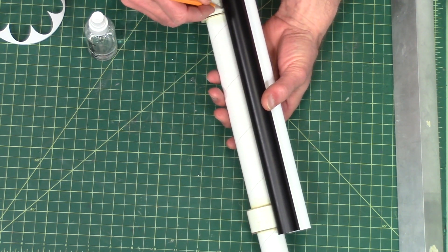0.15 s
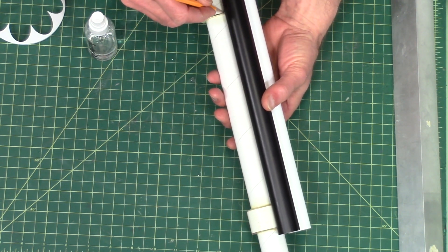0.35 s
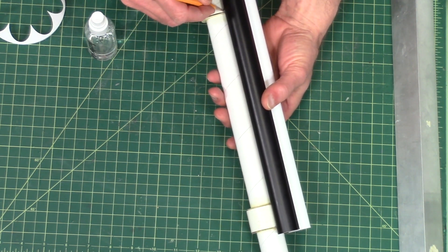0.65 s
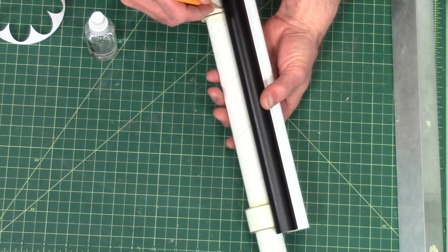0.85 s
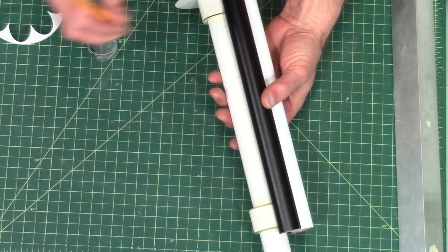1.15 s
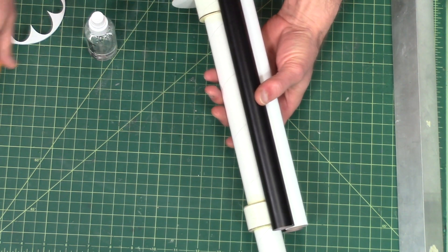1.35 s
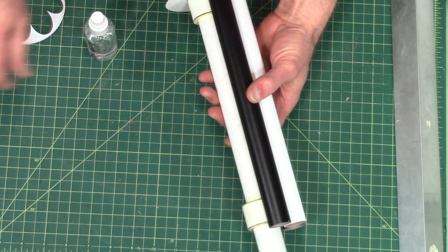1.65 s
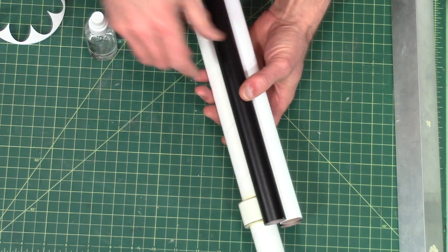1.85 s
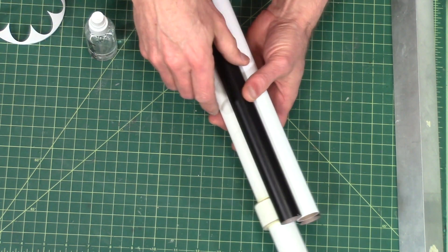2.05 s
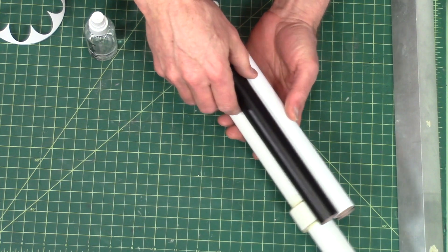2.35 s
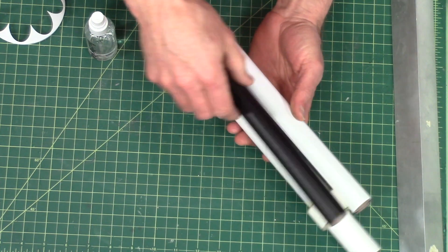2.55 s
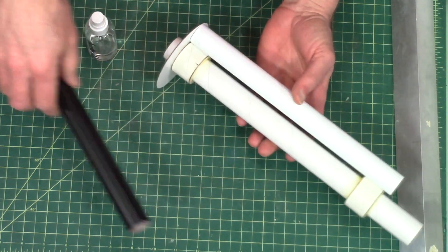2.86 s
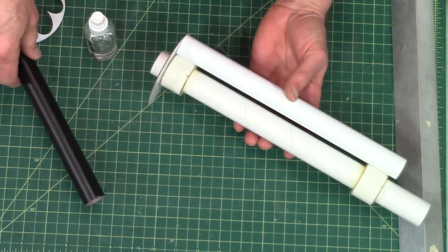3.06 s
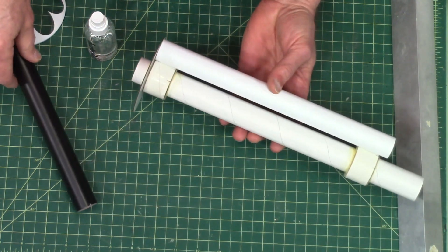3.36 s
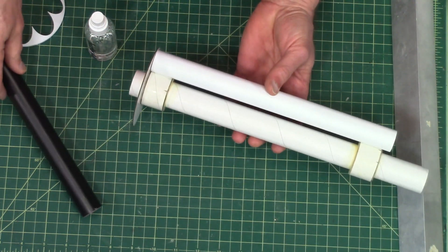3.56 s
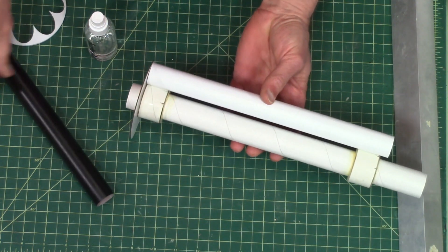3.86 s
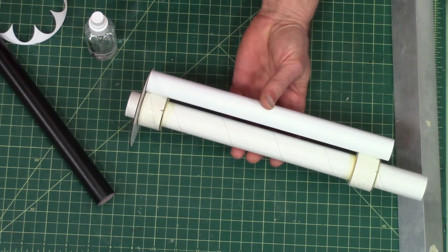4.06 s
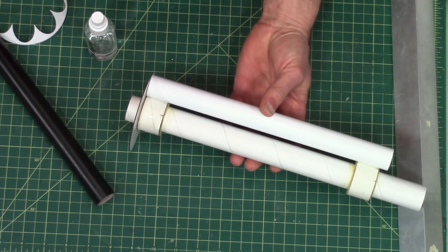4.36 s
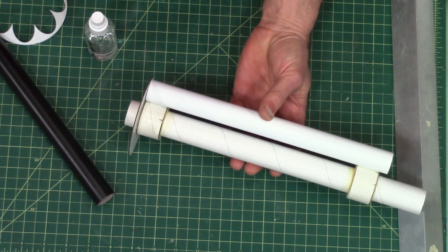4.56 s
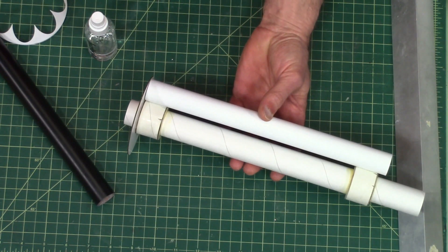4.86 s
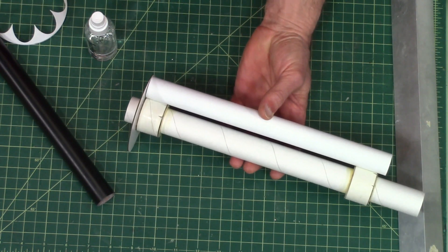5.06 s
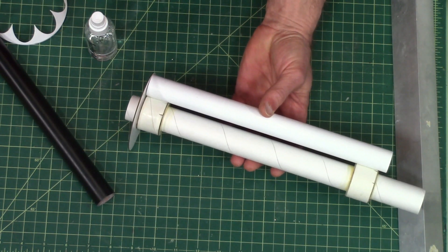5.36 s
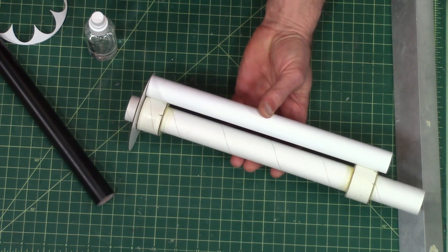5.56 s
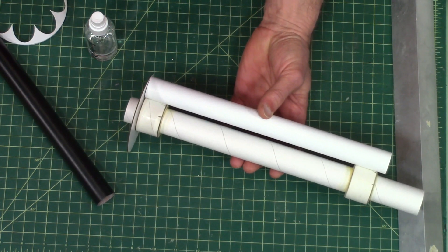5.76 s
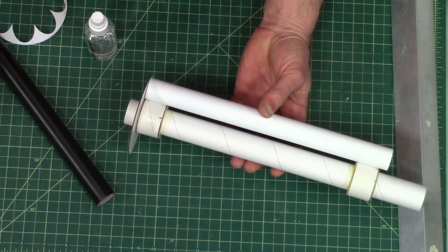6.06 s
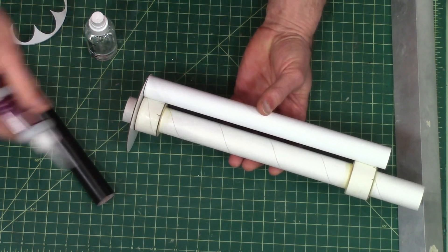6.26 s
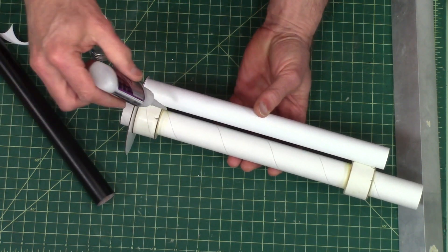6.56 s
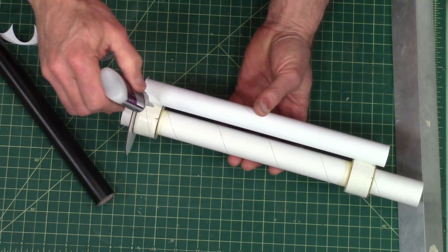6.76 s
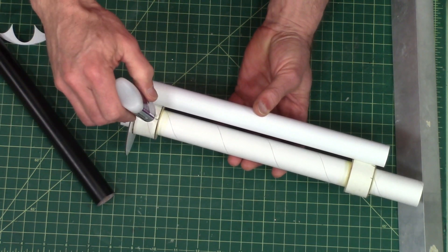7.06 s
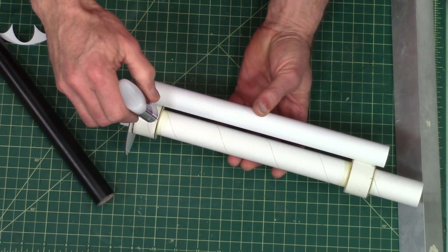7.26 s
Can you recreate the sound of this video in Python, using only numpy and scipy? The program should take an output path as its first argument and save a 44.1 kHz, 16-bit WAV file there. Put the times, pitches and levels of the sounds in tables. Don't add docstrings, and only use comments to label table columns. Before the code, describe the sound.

Dry workbench sounds with a short room tail: very soft pencil scrapes, a snappy pencil bounce, dull hollow cardboard knocks, a tube settling on a rubbery mat and a brief rattle. Later a plastic bottle strikes the bench, lower and more ringing, bouncing briefly. Small rubs, faint squeaks and light taps fill the gaps, over steady hiss and a low wandering engine drone.

```python
import sys
import numpy as np
from scipy import signal
from scipy.fft import rfft, irfft
from scipy.io import wavfile
from scipy.ndimage import uniform_filter1d

SR = 44100
rng = np.random.default_rng(int(sys.argv[2]) if len(sys.argv) > 2 else 0)


def transcribe(u):
    v = np.clip(np.atleast_2d(u).T, -1, 1)
    q = np.round(v * 32767).astype(np.int16)
    wavfile.write(sys.argv[1], SR, q)


def natural_amplitude(level_db):
    exponent = np.asarray(level_db, float) / 20
    return 10 ** exponent


N = 326340


def unit(x):
    return x / np.sqrt(np.mean(x ** 2))


def on_log(hz, table):
    table_hz, value = np.transpose(table)
    return np.interp(np.log(hz + 1), np.log(table_hz), value)


def band(x, hz, width_hz):
    return signal.lfilter(*signal.iirpeak(hz, hz / width_hz, SR), x)


def pair(size, likeness):
    hz = np.fft.rfftfreq(size, 1 / SR)
    shared = np.clip(on_log(hz, likeness), 0, 1)
    mid, side = rfft(rng.standard_normal((2, size)))
    sign = np.array([[1], [-1]])
    return hz, (np.sqrt(1 + shared) * mid + np.sqrt(1 - shared) * side * sign) / np.sqrt(2)


def walk(rate):
    k = int(SR / rate)
    steps = np.repeat(rng.standard_normal(N // k + 1), k)
    return unit(uniform_filter1d(uniform_filter1d(steps, k), k)[:N])


def swells(s, hold, db, rise_db_s, fall_db_s):
    power, t = np.zeros(N), np.arange(N) / SR
    for start, held, level_db in np.broadcast(s, hold, db):
        i, j = np.searchsorted(t, (start - 60 / rise_db_s, start + held + 60 / fall_db_s))
        early = np.maximum(start - t[i:j], 0)
        late = np.maximum(t[i:j] - start - held, 0)
        power[i:j] += natural_amplitude(level_db - rise_db_s * early - fall_db_s * late) ** 2
    return np.sqrt(power)


def hiss():
    # (frequency [Hz], density [dB per Hz])
    colour = [(20, -12), (50, -25), (100, 2.5), (155, -3), (200, -12), (700, -19), (950, -29), (1600, -24),
              (2200, -28.5), (3500, -30.5), (6300, -24.5), (9000, -28.5), (12500, -34), (15800, -36.5)]
    # (frequency [Hz], likeness [0-1])
    likeness = [(60, 0.77), (130, 0.9), (290, 0.32), (640, 0.21), (1410, 0.07), (3100, 0), (6820, 0.22),
                (15000, 0)]
    # (frequency [Hz], width [Hz], extra gain [ratio])
    right_port = (1978, 160, 2.68)
    hz, noise = pair(N, likeness)
    noise = noise * natural_amplitude(on_log(hz, colour)) * (hz < 15830)
    air = unit(irfft(noise, N)) * natural_amplitude(-56.5 + 0.5 * walk(1.66))
    port_hz, width_hz, extra = right_port
    air[1] += extra * band(air[1], port_hz, width_hz)
    return air


def traffic():
    # (time [s], lower mode level [dB], upper mode level [dB])
    passes = [(.15, -52.5, -72), (.4, -54.5, -63), (.95, -58, -69), (1.59, -54.5, -66), (1.87, -52.5, -54),
              (2.3, -53.5, -56.5), (2.68, -56, -56), (3.24, -51.5, -62), (3.72, -52, -59), (4.1, -65, -58),
              (5.12, -64, -57), (5.43, -62, -52), (7.4, -63, -72)]
    s, lower_db, upper_db = np.transpose(passes)
    fade_db_s = 67
    lower_gain = np.hypot(natural_amplitude(-60), swells(s, 0, lower_db, fade_db_s, fade_db_s))
    upper_gain = np.hypot(natural_amplitude(-63), swells(s, 0, upper_db, fade_db_s, fade_db_s))
    lower = unit(band(band(rng.standard_normal(N), 35.9, 7.6), 36.3, 10.7))
    upper = unit(band(band(rng.standard_normal(N), 70.6, 15.0), 70.6, 15.0))
    return lower_gain * lower * np.array([[1], [0.8]]) + upper_gain * upper


def engine():
    # (time [s], frequency [Hz], level [dB])
    drone = [(0.0, 108.6, -66.5), (0.8, 110.5, -63), (0.95, 89.5, -79), (1.01, 88.4, -60),
             (1.09, 105.3, -65), (1.55, 112.6, -56), (1.98, 102.6, -62), (2.23, 91.7, -61.5),
             (2.45, 110.8, -59.5), (2.9, 107.8, -49), (4.64, 97.2, -54.5), (4.93, 110.8, -72),
             (5.05, 97.7, -52.5), (6.04, 96.9, -59.5), (6.16, 113.6, -57.5), (7.4, 92.6, -68)]
    s, drone_hz, drone_db = np.transpose(drone)
    t = np.arange(N) / SR
    phase = 2 * np.pi * np.cumsum(np.interp(t, s, drone_hz)) / SR
    gain = natural_amplitude(np.interp(t, s, drone_db) + 1.85 * walk(11.0))
    return gain * np.sqrt(2) * np.sin(phase)


def floor():
    left, right = hiss() + traffic() + engine()
    return np.array([left, np.roll(right, 3)])


def slips(rate=5500.0, grain_db=1.5):
    size = natural_amplitude(grain_db * rng.exponential(size=(2, N)))
    happens = rng.random((2, N)) < rate / SR
    return unit(happens * rng.choice([-1., 1.], (2, N)) * size)


def window(s, length, edge):
    t = np.arange(N) / SR - s
    return np.clip(np.minimum(t / edge, 1 + (length - t) / (2 * edge)), 0, 1) ** 2


def pencil():
    # (time [s], length [s], lead resonance [Hz], scrape level [dB], sheen level [dB])
    strokes = [
        (0.094, 0.075, 4300, -58.5, -62.5),
        (0.245, 0.094, 4230, -60.5, -65),
        (0.419, 0.033, 4050, -54.5, -60.5),
        (0.537, 0.049, 4130, -62.5, -66.5),
        (0.664, 0.05, 4200, -61.5, -64),
        (0.778, 0.049, 4100, -62.5, -70),
        (0.844, 0.067, 6700, -59, -64.5),
        (0.924, 0.029, 3750, -57, -58),
    ]
    out = np.zeros((2, N))
    size = int(1.2 * SR)
    slip = slips()[:, :size]
    card = unit(band(band(slip, 6100, 740.0), 6100, 1300.0))
    sheen = unit(band(band(slip, 9000, 2300.0), 9000, 3500.0))
    for s, length, lead_hz, scrape_db, sheen_db in strokes:
        lead = unit(band(band(slip, lead_hz, 910.0), lead_hz, 2000.0))
        stroke = natural_amplitude(scrape_db - 5.5) * (lead + natural_amplitude(-2) * card) + natural_amplitude(sheen_db) * sheen
        out[:, :size] += stroke * window(s, length, 0.018)[:size]
    return out


def squeaks():
    # (time [s], length [s], frequency [Hz], level [dB])
    squeak_rows = [(.95, .012, 3700, -60), (1.38, .06, 380, -65), (1.507, .017, 160, -47),
                   (1.6053, .0022, 6130, -24), (1.6055, .0018, 10400, -44), (2.283, .014, 2100, -63),
                   (2.412, .04, 470, -62), (2.415, .045, 780, -60), (2.42, .03, 950, -64),
                   (3.201, .021, 5600, -49), (3.228, .016, 4080, -35), (3.236, .011, 5850, -38),
                   (3.438, .035, 2230, -57), (3.44, .0041, 5750, -47), (3.442, .0036, 7200, -45),
                   (3.598, .06, 3900, -62), (3.599, .062, 241, -63), (3.602, .005, 2160, -55),
                   (3.609, .047, 380, -63), (3.772, .045, 2200, -70), (3.778, .05, 3950, -70),
                   (3.833, .012, 6000, -45), (3.836, .008, 3950, -38), (3.858, .06, 2220, -57),
                   (3.86, .05, 3980, -57), (3.872, .057, 4750, -56), (3.925, .045, 2220, -62),
                   (4.068, .0033, 1966, -50), (4.5, .07, 700, -71), (4.87, .018, 1550, -61),
                   (4.926, .026, 400, -61), (5.2115, .00055, 8000, -19), (5.219, .0006, 6400, -34),
                   (5.771, .064, 1600, -65.5), (5.93, .024, 1780, -65)]
    out, size = np.zeros((2, N)), SR // 4
    for s, length, hz, db in squeak_rows:
        i = int(s * SR)
        shape = window(0, length, 0.0009)[:size]
        tone = band(band(rng.standard_normal(size), hz, hz / 12), hz, hz / 8)
        tone = np.roll(tone, -size // 2) * shape
        out[:, i:i + size] += natural_amplitude(db) * tone * np.sqrt(np.sum(shape ** 2) / np.sum(tone ** 2))
    return out


def blows(events, modes, clatter_db, tick_left_db, left_db, rock_db, pure_db=0, tuned_db=0,
          contact=1.2, top_hz=11200):
    # (low edge [Hz], high edge [Hz], decay [s])
    clatter = [(166, 880, 0.0056), (1190, 3190, 0.002), (2690, 6800, 0.0013), (6100, 10050, 0.00022)]
    out, t, size = np.zeros((2, N + SR)), np.arange(SR // 3) / SR, 2048
    hz, db, t60 = np.transpose(modes)
    group = np.searchsorted([1000, 2800], hz)
    filters = [signal.butter(2, (lo_hz, hi_hz), "band", fs=SR, output="sos") for lo_hz, hi_hz, _ in clatter]
    decays = np.exp(-np.log(1000) * t / t60[:, None])
    for number, (s, crack_db, thud_db, ring_db, tick_db) in enumerate(events):
        pan_db = np.clip(left_db + rock_db * (-1.) ** number, -6, 6)
        part_db = np.array([thud_db, ring_db, crack_db, tick_db - clatter_db])
        burst_db = part_db + clatter_db - np.array([tuned_db, pure_db, 0, 0])
        loudness, detune, phase, spread = rng.standard_normal((4, len(hz), 1))
        gain = natural_amplitude(db + 1.5 * loudness[:, 0] + part_db[group] - 10.5)
        f = hz[:, None] * (1 + 0.0058 * detune)
        mid, side = rng.standard_normal((2, size))
        i = int((s + 0.0004) * SR)
        for ear, sign in enumerate((1, -1)):
            turn = 2 * np.pi * f * t + 0.5 * phase + sign * spread * np.minimum(f / 2500, 0.8)
            ring = gain @ (np.sin(turn) * decays) * np.minimum(t / 0.00039, 1)
            for k, (lo_hz, hi_hz, decay) in enumerate(clatter):
                width_hz = hi_hz - lo_hz
                burst = 1.096 * (mid + sign * min(lo_hz / 1500, 0.9) * side)
                burst = burst * np.exp(-t[:size] / decay) * np.sqrt(SR / 4 / width_hz)
                burst[ear * k] += contact * SR / 2 / width_hz
                lean_db = sign * tick_left_db / 2 if k == 3 else 0
                ring[:size] += signal.sosfilt(filters[k], burst) * natural_amplitude(burst_db[k] + lean_db)
            out[ear, i:i + len(t)] += ring * natural_amplitude(sign * pan_db / 2)
    return signal.sosfilt(signal.butter(6, top_hz, fs=SR, output="sos"), out[:, :N])


def pencil_drop():
    # (time [s], crack level [dB], thud level [dB], ring level [dB], tick level [dB])
    drops = [
        (1.5114, -50, -49.5, -66, -62),
        (1.5204, -31.5, -48, -38, -38),
        (1.5268, -43, -44.5, -56, -40),
        (1.6014, -19, -38.5, -29.5, -17.5),
        (1.6042, -22.5, -43, -40, -34),
        (1.6075, -46, -49, -48, -20.5),
    ]
    # (frequency [Hz], level [dB], t60 [s])
    modes = [(161.5, 7.5, 0.047), (219, 5, .05), (390, 3, 0.03), (497, 0, 0.057), (573, -6, 0.026),
             (640, -6, 0.018), (1470, -18, 0.012), (1700, 6, 0.021), (2005, 3, 0.02), (2170, 15.5, 0.0056),
             (3130, -7, 0.015)]
    return blows(drops, modes, clatter_db=-4.5, tick_left_db=12.5, left_db=-1.5, rock_db=0.5,
                 contact=0.65, top_hz=13900)


def tube_knock():
    # (time [s], crack level [dB], thud level [dB], ring level [dB], tick level [dB])
    knocks = [
        (2.041, -46, -75, -50, -46),
        (2.1118, -55, -57, -52, -47),
        (2.4055, -37.5, -57, -34.5, -48),
        (2.4122, -29, -56, -38, -29),
        (2.4159, -41, -69, -40.5, -56),
        (2.573, -36, -53.5, -40.5, -44),
        (2.6675, -23.5, -37, -30, -27),
        (2.6715, -23, -32, -22.5, -33),
        (2.6762, -46, -27, -21.5, -43),
        (2.681, -40, -42, -41, -47),
    ]
    # (frequency [Hz], level [dB], t60 [s])
    modes = [(225, -14.5, 0.16), (273, -10, 0.033), (308, 2.5, 0.052), (393, 3.5, 0.055), (460, 0, 0.038),
             (484, 2.5, 0.044), (616, 4, 0.025), (730, -2, .03), (995, -10, 0.018), (1336, -1.5, 0.028),
             (1622, -5.5, 0.026), (1890, 2.5, 0.023), (2030, -8, 0.025), (4450, 4, 0.0026)]
    return blows(knocks, modes, clatter_db=-5.0, tick_left_db=7.0, left_db=-2.0, rock_db=0.5,
                 tuned_db=8, pure_db=1, contact=0.31)


def handling(column):
    # (time [s], hold [s], scrape level [dB], sheen below scrape [dB], tube wall below scrape [dB])
    grips = [
        (2.044, 0.11, -58.5, 6.5, 9),
        (2.394, 0.064, -63, 23, 0),
        (2.772, 0.014, -58.5, 10, 6),
        (3.859, 0.049, -44, 22, 7.5),
        (4.252, 0.0097, -71, 13, -5),
        (4.877, 0.038, -63, 5, 1),
        (5.767, 0.04, -56, 4.5, 7.5),
        (6.21, .03, -64.5, 5, 20),
        (6.261, 0.0042, -60.5, 3, 17),
    ]
    # (time [s], hold [s], scrape level [dB], sheen below scrape [dB], tube wall below scrape [dB])
    slides = [(2.2, .066, -67.5, 8, 3.3), (2.36, .022, -63, 3, 9), (2.47, .025, -78, 18, .3),
              (2.914, .01, -65, 8.1, 5.6), (3.088, .0075, -65, 10, 15), (3.18, .01, -62, 10.6, 17),
              (3.37, 0.064, -64.5, 16, 12), (3.45, .0086, -54, 17, 8.3), (3.635, .0083, -59, 3, 6.4),
              (3.82, .01, -64, 15, 6.7), (4.02, .05, -82, 12, 4), (4.345, .029, -60, 4, 4.8),
              (4.45, .22, -70.5, 5.1, 3), (5.93, .013, -53.5, 1.6, 7.6), (5.99, 0.031, -56, 1.2, 21),
              (6.1, .089, -79, 6, 9), (6.32, .034, -65.5, 4.6, 14)]
    total = 0
    for rows, rise_db_s, fall_db_s in ((grips, 1500, 321), (slides, 308, 330)):
        columns = np.transpose(rows)
        below_db = columns[column] if column else 0
        total = total + swells(columns[0], columns[1], columns[2] - below_db, rise_db_s, fall_db_s)
    return total


def rubbing():
    # (frequency [Hz], width [Hz], level [dB])
    scrape_modes = [(3576, 1800, -2), (4700, 2000, 0), (5770, 1800, 8)]
    slip = slips() * natural_amplitude(3.0 * walk(40))
    scrape = unit(sum(natural_amplitude(db) * band(band(slip, hz, w), hz, 2 * w) for hz, w, db in scrape_modes))
    sheen = unit(band(band(band(slip, 8200, 2200.0), 8200, 4000.0), 8200, 5000.0))
    wall = unit(band(band(slip, 1630, 450.0) + band(slip, 2080, 490.0), 1630, 1500.0))
    return handling(column=0) * scrape + handling(column=3) * sheen + handling(column=4) * wall


def tube_down():
    # (time [s], crack level [dB], thud level [dB], ring level [dB], tick level [dB])
    landings = [
        (3.1958, -40, -64, -48, -47),
        (3.1995, -32, -50.5, -40, -40),
        (3.2255, -24, -38.5, -26, -38),
        (3.2305, -22, -35.5, -30.5, -30),
        (3.2385, -29, -36, -35, -33),
        (3.2435, -23.5, -44, -48, -38),
        (3.2505, -41, -47, -44, -41),
        (3.263, -38, -48, -42, -55),
        (3.4436, -45, -52.5, -57, -44),
    ]
    # (frequency [Hz], level [dB], t60 [s])
    modes = [(212, 1, .08), (230, -3, 0.075), (308, -6, 0.041), (367, 6.5, 0.042), (440, -2.5, 0.076),
             (640, -2, .04), (860, -11, .03), (1374, 0.5, 0.025), (1630, -7, 0.016), (1860, -0.5, 0.022),
             (2070, 1.5, 0.033), (2200, 5, 0.017), (4050, -6, 0.017), (5660, 11, 0.0043)]
    return blows(landings, modes, clatter_db=-5.5, tick_left_db=28.0, left_db=-2.3, rock_db=1.0,
                 contact=0.47, top_hz=12500)


def taps():
    # (time [s], crack level [dB], thud level [dB], ring level [dB], tick level [dB])
    touches = [(3.601, -50, -61, -49, -56), (5.7628, -57, -77, -64, -64), (5.7628, -61.5, -49, -59, -63),
               (6.2035, -48, -58, -58, -64), (6.2095, -58, -45.5, -49, -64), (6.291, -51, -57, -51.5, -70),
               (6.304, -58, -59, -65, -70), (3.601, -50, -56, -58, -54), (6.5587, -34, -41.5, -35.5, -45),
               (6.5649, -40.5, -45, -45, -43.5), (6.574, -44, -48.5, -57, -50),
               (6.586, -48, -58, -44.5, -58)]
    # (frequency [Hz], level [dB], t60 [s])
    modes = [(195, 3, 0.019), (238, 2.8, 0.06), (398.8, 3.8, 0.075), (546, 1.3, 0.014), (1500, 3.4, 0.021),
             (2040, 3, 0.022)]
    return blows(touches, modes, clatter_db=-5.0, tick_left_db=11.0, left_db=-3.5, rock_db=-3.5, contact=0.07)


def tube_rattle():
    # (time [s], crack level [dB], thud level [dB], ring level [dB], tick level [dB])
    rattles = [(3.8322, -28.5, -39, -37, -25.5), (3.8372, -32, -40, -38, -31), (3.8415, -41, -48, -55, -35),
               (3.847, -41, -44, -52, -41), (3.8525, -30, -60, -47, -45), (3.8573, -31.5, -47, -40, -45),
               (3.862, -36, -49, -42, -40), (3.8695, -37, -44, -38, -46), (3.873, -45, -44.5, -47, -36),
               (3.8805, -42, -46.5, -40, -37), (3.892, -35, -42.5, -41, -40), (3.903, -40, -59, -41.5, -44),
               (3.915, -44, -49, -54, -48), (3.933, -52, -61, -55, -53), (3.955, -58, -62, -56, -61)]
    # (frequency [Hz], level [dB], t60 [s])
    modes = [(219, 3, 0.065), (247, 0, 0.037), (363, 4, 0.047), (437, -4, 0.057), (1470, -2, 0.021),
             (2193, -5, 0.13), (2210, 7.5, .02), (3840, -12, .015), (3830, -11, 0.011), (5000, 0, 0.0099),
             (5700, 4, 0.012), (8720, 1, 0.014)]
    return blows(rattles, modes, clatter_db=-4.5, tick_left_db=11, left_db=-1.0, rock_db=-1.5,
                 pure_db=-0.5, contact=0.71, top_hz=14000)


def bottle():
    # (time [s], crack level [dB], thud level [dB], ring level [dB], tick level [dB])
    strikes = [
        (5.0938, -49, -48.5, -51.5, -70),
        (5.1176, -28, -30.5, -20.5, -35),
        (5.1221, -44, -25, -38, -56),
        (5.1333, -46, -49, -58, -51),
        (5.1646, -28.5, -59, -32, -38),
        (5.2119, -20.5, -29.5, -18.5, -16.5),
        (5.2164, -27, -31.5, -40, -30),
        (5.2245, -32, -31, -25, -36),
        (5.2425, -28, -34, -32, -28.5),
        (5.2585, -34, -34.5, -31.5, -41),
    ]
    # (frequency [Hz], level [dB], t60 [s])
    modes = [(203.1, -4.5, 0.2), (291.3, -0.5, 0.13), (426, 4, 0.053), (470, 3.5, 0.073), (596, -1.5, .06),
             (684, 8, 0.047), (790, 2.5, 0.045), (867, -9, .04), (1377, 0.5, 0.032), (1480, -1, .04),
             (1570, 10.5, 0.049), (1601.5, -0.5, 0.14), (1663, 6, 0.036), (1910, -2, 0.035)]
    return blows(strikes, modes, clatter_db=-0.5, tick_left_db=23.5, left_db=-1.0, rock_db=-0.5,
                 pure_db=3.0, tuned_db=-1.5, contact=1.06, top_hz=13900)


def room(x):
    # (frequency [Hz], likeness [0-1])
    likeness = [(150, 1), (700, 0.84), (1400, 0.33), (3000, 0)]
    # (frequency [Hz], level [dB])
    colour = [(150, -8.5), (400, 5), (800, -2), (1100, -1), (2000, 5.5), (6000, 4.5), (10000, 4),
              (15000, 3)]
    # (frequency [Hz], t60 [s])
    tail_t60 = [(150, 0.81), (400, 0.27), (1000, 0.2), (2500, 0.17), (6000, 0.18), (10000, 0.12),
                (15000, 0.074)]
    # (frequency [Hz], level [dB], t60 [s])
    bench_modes = [(200, -4, 0.42), (226, -2, .6), (255.6, -5, .4), (303, -0.5, 0.6), (325, -12, 0.23),
                   (370.4, -1.5, .3), (424, 2, 0.24), (462, 1.5, 0.41), (478, -1, 0.35), (538, -5, 0.23),
                   (577, -3, 0.22), (630, 0, 0.24), (687, 5.5, 0.19), (772, -5, 0.15)]
    # (delay [s], left level [dB], right level [dB])
    echoes = [(.0043, -8, -7), (.0058, -10, -8), (.0091, -13, -14)]

    def energy(v):
        return np.sqrt(np.sum(v ** 2, axis=-1).mean())

    size = SR // 2
    t = np.arange(size) / SR
    hz, noise = pair(size, likeness)
    tail = 0
    for centre in 100 * 2 ** np.arange(0, 7.6, 0.5):
        share = np.clip(1 - 2 * abs(np.log2((hz + 1) / centre)), 0, 1)
        decay = np.exp(-np.log(1000) * t / on_log(centre, tail_t60))
        tail = tail + irfft(noise * share, size) * natural_amplitude(on_log(centre, colour)) * decay
    rise = np.clip((t - 0.002) / 0.0018, 0, 1)
    even_hz = 40.75
    for _ in range(3):
        spec = rfft(tail * rise)
        fine = uniform_filter1d(abs(spec) ** 2, int(even_hz * size / SR))
        broad = uniform_filter1d(abs(spec) ** 2, int(8 * even_hz * size / SR))
        tail = irfft(spec * np.sqrt(broad / (fine + 1e-9)), size) * np.clip(4 - 4 * t / t[-1], 0, 1)
    tail = tail * rise
    ring_hz, db, t60 = np.transpose(bench_modes)[:, :, None]
    bench = np.sum(natural_amplitude(db) * np.sin(2 * np.pi * ring_hz * t) * np.exp(-np.log(1000) * t / t60), axis=0)
    tail = natural_amplitude(-1) * tail / energy(tail) + natural_amplitude(-20.5) * bench / energy(bench)
    early = np.zeros((2, size))
    for s, *echo_db in echoes:
        early[:, int(s * SR)] = natural_amplitude(echo_db)
    early = signal.sosfilt(signal.butter(2, 2630, "high", fs=SR, output="sos"), early)
    early[:, 0] += 1
    wet = signal.fftconvolve(x.mean(axis=0, keepdims=True), tail, axes=1)
    return (signal.fftconvolve(x, early, axes=1) + wet)[:, :N]


def scene():
    hits = pencil_drop() + tube_knock() + tube_down() + taps() + tube_rattle() + bottle()
    sung = squeaks()
    rubs = 0.4 * sung + pencil() + rubbing()
    return room(hits + 0.37 * sung) + rubs + floor()


def top_cut(x):
    return signal.sosfilt(signal.butter(12, 16760, fs=SR, output="sos"), x)


def record(dry):
    # (frequency [Hz], width [Hz])
    notches = [(2600, 290), (7700, 540)]
    for hz, width_hz in notches + notches:
        dry = signal.lfilter(*signal.iirnotch(hz, hz / width_hz, SR), dry)
    return top_cut(dry)


dry = scene()
out = record(dry)
transcribe(out)
```